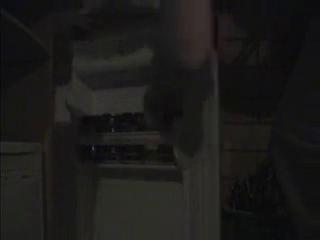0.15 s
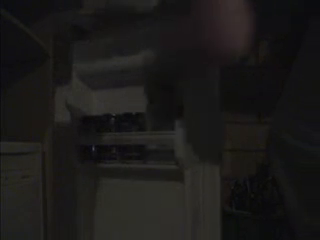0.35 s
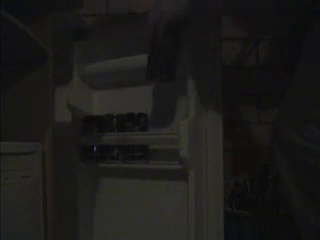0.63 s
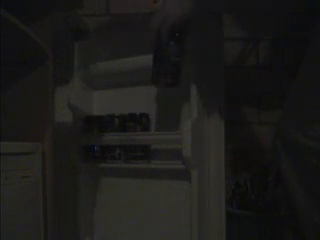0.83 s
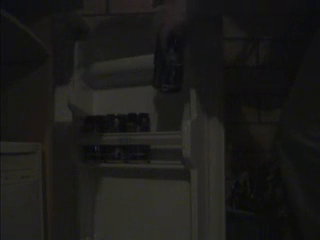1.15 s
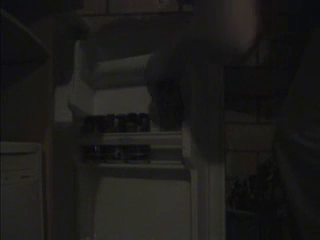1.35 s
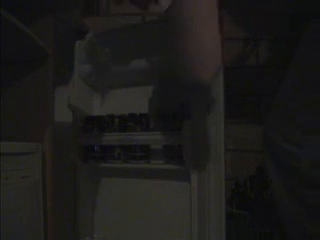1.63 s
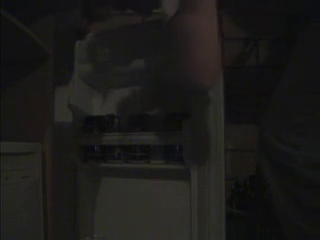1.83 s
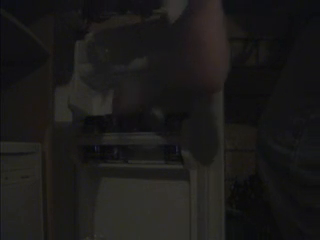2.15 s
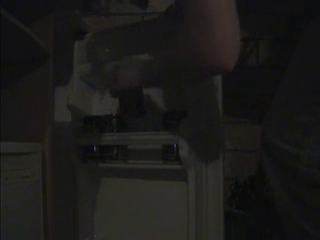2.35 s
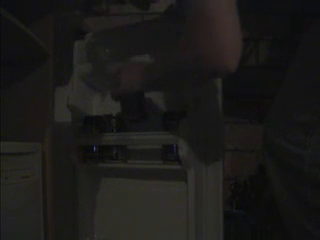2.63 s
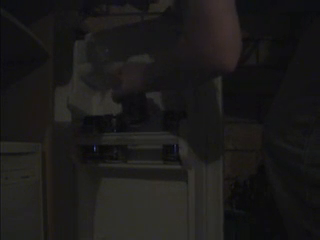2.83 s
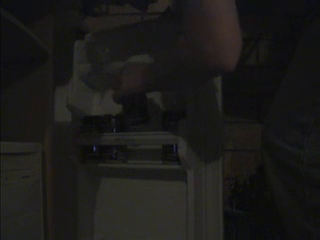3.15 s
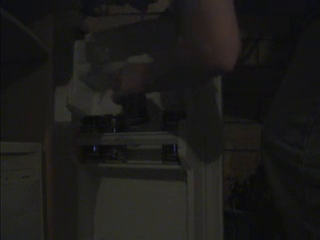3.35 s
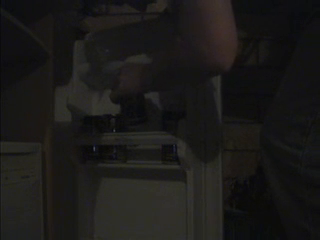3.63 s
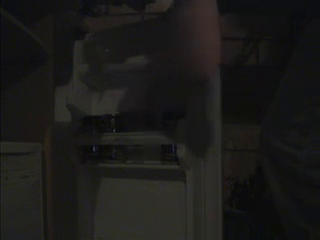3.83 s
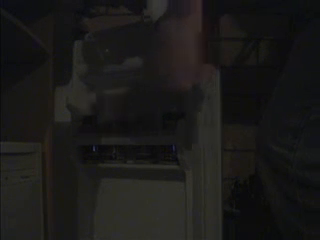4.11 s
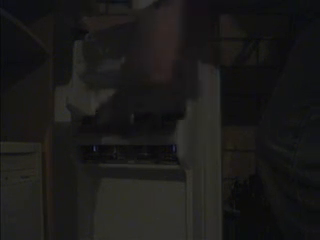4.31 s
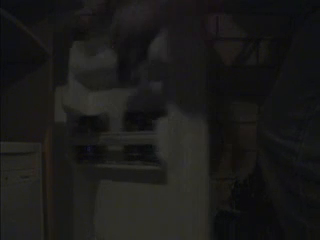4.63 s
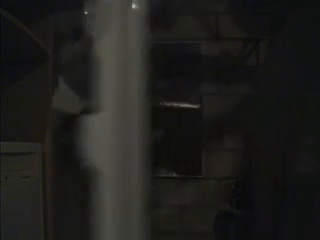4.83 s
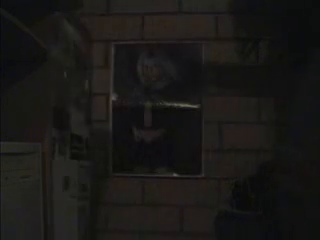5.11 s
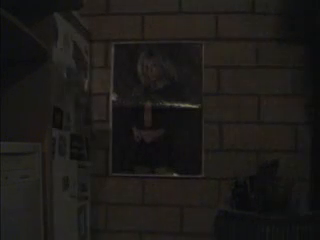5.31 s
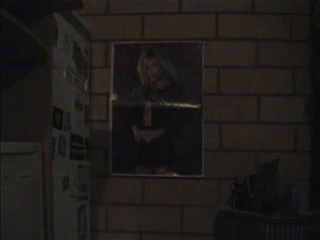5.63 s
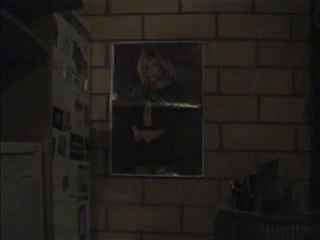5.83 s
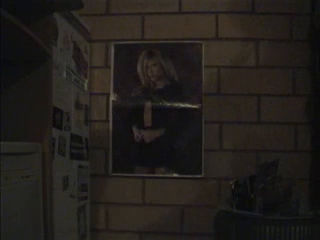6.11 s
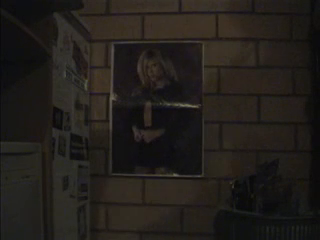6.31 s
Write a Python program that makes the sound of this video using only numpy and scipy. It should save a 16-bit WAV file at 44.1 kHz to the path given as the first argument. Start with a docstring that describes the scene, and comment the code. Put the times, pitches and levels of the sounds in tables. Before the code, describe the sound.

Stereo microphone near an open fridge: dull metallic can clunks, bright little ticks and short scraping slides against a plastic shelf, in uneven bunches. After nearly two seconds of near-quiet, the cans are handled again more densely. The door then thuds shut, deep and rattling, with a short room response; faint hum, hiss and one or two tiny late rubs remain.

```python
"""Over hum and a band of hiss, the scene opens with the door panel already ringing low and a rub, then drink
cans knock in a fridge door shelf. At about 5.4 s the door swings shut with a boom and a rattle; all is heard
close by, in a kitchen, in stereo. Knocks, pushes and slams are blows on dying sine modes, with noise puffs for
the ticks; slides are random grains. Sparse decaying taps give the kitchen's answer; room noise and hiss are
random spectra, the hum blurred sines."""
import sys
import numpy as np
from scipy import signal
from scipy.fft import rfft, irfft, next_fast_len
from scipy.io import wavfile
from scipy.ndimage import uniform_filter1d

SR = 44100
rng = np.random.default_rng(int(sys.argv[2]) if len(sys.argv) > 2 else 0)


def output_pcm(signal):
    """Save a mono or channel-first signal as 16-bit PCM at the path in sys.argv[1].

    Samples are clipped to [-1, 1] before scaling.
    """
    pcm = np.clip(np.atleast_2d(signal).T, -1, 1) * 32767
    wavfile.write(sys.argv[1], SR, np.round(pcm).astype(np.int16))


N = 285327

# broad room noise, relative spectrum: f/Hz, level/dB per Hz
ROOM_NOISE = [(15, -28), (30, -26), (70, -1.5), (125, -11), (230, 6), (320, -8.5), (600, 4), (830, -6.5),
              (1500, -10.5), (2000, -9), (3200, -25), (5300, -35), (8000, -69)]
# band of hiss, relative spectrum: f/Hz, level/dB per Hz
HISS_BAND = [(2940, -9), (5000, -12), (6340, 4.5), (7120, -4.5), (8810, -45.5), (9250, -20), (9940, -19),
             (12100, -35), (12500, -43), (15900, -34)]
ROOM_NOISE_DB, HISS_DB = -47, -49  # rms
# left-right likeness of room noise and hiss: f/Hz, correlation
LIKENESS = [(60, 0.35), (130, 0.75), (290, 0.35), (640, 0.16), (1410, 0.39), (3100, 0.76), (6820, 0.48),
            (15000, 1)]
# lines of the fridge motor and fan: f/Hz, width/Hz, rms level/dB
HUM_LINES = [(50, 5, -63), (91, 4, -54), (223, 10, -62), (286, 5, -61), (482, 8, -65), (611, 8, -61),
             (758, 6, -67), (1930, 4, -62), (1960, 4, -64)]
# blows on the door panel: a low ring already going as the scene opens, then a hand leaning on it: t/s, peak
# level/dB
HAND_NUDGES = [(0.0, -16), (4.69, -14)]
# modes of the door panel: f/Hz, relative level/dB, t60/s
PANEL_MODES = [(76.8, -2.5, 0.36), (87, -7, 0.39), (100.75, 3, 0.51), (123, 3.5, 0.11), (150, 4.5, 0.38),
               (162.3, 8.5, 0.089), (178.3, 2.5, 0.26)]
# hand and cans sliding: start t/s, length/s, level/dB, swell over the stroke/dB, tone of the rubbed can f/Hz
STROKES = [(0.0, 0.17, -31.5, -5, 560), (0.128, 0.093, -21.5, -10.5, 1500), (0.41, 0.26, -36.5, -2, 1060),
           (1.093, 0.077, -41, -4.5, 700), (1.772, 0.2, -37.5, -13, 900), (1.923, 0.095, -25.5, -5.5, 900),
           (2.041, 0.12, -29.5, -10, 940), (2.217, 0.22, -44, -7, 1900), (2.407, 0.051, -42.5, 18, 900),
           (4.289, 0.11, -17, -27, 950), (4.451, 0.13, -24.5, -6.5, 950), (4.58, 0.14, -29.5, -6, 1470),
           (4.752, 0.12, -27, -5, 890), (4.85, 0.067, -28, -2.5, 2460), (4.96, 0.042, -34.5, -10.5, 900),
           (5.044, 0.081, -45.5, 0, 900), (5.123, 0.15, -38, -0.5, 1150), (5.392, 0.13, -32.5, 7, 910),
           (5.578, .17, -42, -1.5, 650), (6.059, 0.072, -49.5, 9.5, 900), (6.17, 0.15, -40, -14, 900)]
# relative spectrum of the rubbing: f/Hz, level/dB per Hz
RUB_SPECTRUM = [(59, -55), (100, 3), (255, -7), (451, -7.5), (1020, -11.5), (1530, -7), (2600, -16.5),
                (4890, -23.5), (6770, -30.5), (9380, -53.5), (13000, -53)]
GRIP_S, LET_GO_S = 0.015, 0.032  # fades outside each stroke
GRAINS_PER_S, GRAIN_SPREAD_DB, RUNG_DB = 2500, 4.5, -5  # RUNG_DB: ringing against bare rubbing
# decay of the kitchen: f/Hz, t60/s
KITCHEN_DECAY = [(60, 0.92), (160, 0.35), (420, 0.61), (1100, 0.32), (2910, 0.36), (7680, 0.14)]
# the opposed left-right part of the kitchen: f/Hz, gain/dB
KITCHEN_WIDTH = [(60, -37.5), (180, -28), (550, -27.5), (1650, -27), (5000, -43), (15000, -23)]
# cans against the shelf and each other: t/s, peak level/dB of panel (before its high-pass), shelf, can wall
# (before its left-right balance) and rim, then wall tone f/Hz, rim tone f/Hz
CAN_KNOCKS = [(0.014, -29, -52, -20, -42, 570, 1650), (0.117, -18, -7, -8.5, -18.5, 820, 1960),
              (0.124, -22, -4.5, -17, -14, 840, 2300), (0.147, -38, -13.5, -22, -18.5, 940, 1850),
              (0.179, -22, -11.5, -12, -20, 720, 1980), (0.197, -28, -26, -22, -25, 685, 2400),
              (0.252, -23.5, -31, -31, -40, 630, 1950), (0.38, -30.5, -48, -20, -23.5, 920, 1665),
              (0.403, -23, -14.5, -42, -24.5, 1087, 2560), (0.488, -28, -26, -21, -32.5, 1010, 1900),
              (0.542, -44, -38, -26, -42, 776, 2000), (0.581, -22, -38, -22.5, -29, 790, 1990),
              (0.604, -19, -8.5, -17.5, -7.5, 800, 2020), (0.611, -16, -21, -15, -27, 776, 2120),
              (0.633, -35, -9, -15.5, -18.5, 666, 1940), (0.65, -19.5, -42, -35, -58, 670, 2270),
              (0.848, -28, -33, -46, -42, 740, 2010), (1.105, -31, -25.5, -23.5, -36.5, 573, 2140),
              (1.403, -42.5, -37, -52, -57, 740, 2100), (1.738, -17.5, -15.5, -12, -12.5, 620, 2500),
              (1.747, -23, -10.5, -12, -15, 740, 2400), (1.773, -18, -33, -32, -51, 600, 2100),
              (1.791, -37, -16.5, -18.5, -19, 680, 2420), (1.82, -26, -21, -38, -39, 670, 2210),
              (1.922, -23, -33, -3.5, -13, 930, 1740), (1.932, -23.5, -45.0, -12, -22, 780, 1730),
              (1.954, -51, -22, -10, -19, 920, 1670), (1.987, -25, -30, -19, -25.5, 820, 2080),
              (2.03, -40, -46, -10, -18.5, 1010, 1990), (2.043, -28, -24, -28, -16, 1130, 1670),
              (2.065, -24, -22, -12.5, -20, 890, 1770), (2.084, -23, -16, -16, -22, 960, 1830),
              (2.103, -38, -25, -17, -25, 890, 2010), (2.121, -19, -31, -42, -36, 800, 2000),
              (2.202, -21, -25, -32.5, -33, 710, 2090), (2.278, -38, -32, -46, -36.5, 740, 2050),
              (2.299, -32, -54, -55, -30.5, 740, 2040), (2.425, -24, -37, -26, -35, 900, 1790),
              (2.459, -12.5, -9.5, -14.5, -12.5, 706, 2090), (2.47, -15, -14, -19, -39, 710, 2040),
              (4.145, -24, -4, -13.5, -6.5, 690, 1930), (4.152, -27, -7, -15, -16, 690, 2010),
              (4.169, -13, -9.5, -47, -42, 740, 1970), (4.181, -28, -7, -13, -11, 670, 2000),
              (4.205, -28, -13, -21, -24, 700, 2060), (4.264, -16, -23, -7.5, -11, 1200, 2030),
              (4.273, -21, -21.5, -2.5, -41, 880, 1910), (4.292, -33, -19, -8, -34, 960, 1790),
              (4.447, -33, -29, -5, -26, 910, 1550), (4.474, -27.5, -20, -8, -22.5, 795, 1860),
              (4.494, -24, -37, -12, -24.5, 790, 1830), (4.51, -43, -30.0, -12.5, -22, 880, 1690),
              (4.564, -18.5, -4, -13.5, -10, 665, 1990), (4.572, -30, -8.5, -28, -18.5, 700, 2170),
              (4.588, -14.5, -7.5, -16, -27, 880, 2000), (4.637, -17, -40, -40, -29.5, 680, 3300),
              (4.676, -14.5, -13.5, -18, -17, 724, 2030), (4.698, -28, -28, -41, -24, 740, 2400),
              (4.729, -30, -26, -43, -29, 700, 2190), (4.752, -31, -39, -14, -23, 930, 1830),
              (4.779, -38, -48, -19, -28, 850, 2010), (4.813, -31, -21, -9.5, -20, 890, 1620),
              (4.853, -29, -15, -33, -21.5, 770, 2570), (4.88, -43.0, -6.5, -19.5, -16, 700, 2310),
              (4.913, -23.5, -17, -21.5, -33, 640, 2400), (4.937, -23, -26, -39, -33, 700, 2000),
              (5.188, -44.0, -65, -34, -34.5, 650, 2000), (5.228, -31, -30.5, -34, -33, 600, 1990),
              (6.101, -30, -30, -51, -51, 940, 1900)]
# modes of the plastic shelf: f/Hz, relative level/dB, t60/s
SHELF_MODES = [(201.2, -11.5, 0.11), (231.3, -6.5, 0.17), (246, -15.5, 0.039), (265.2, -2.5, 0.17),
               (291.4, -15, 0.23), (350.4, -16, 0.093), (382, -20, 0.1), (475, -15.5, 0.054),
               (554.5, -20, 0.11)]
# modes of a can's wall: f/Hz, relative level/dB, t60/s
WALL_MODES = [(558, 7, 0.03), (670, 1, 0.025), (675, 2.5, 0.026), (786.4, -4, 0.065), (830, -4.5, 0.059),
              (874, -7.5, 0.035), (920, 0.5, 0.053), (969, -0.5, 0.04), (1010, -6.5, 0.028),
              (1074, 6, 0.022), (1102, -7, 0.053), (1219, 2, 0.054), (1363, 4.5, 0.033), (1505, 4, 0.022)]
# modes of a can's rim: f/Hz, relative level/dB, t60/s
RIM_MODES = [(1560, -8, 0.025), (1671, -9, 0.041), (1910, -14.5, 0.012), (1945, -5, 0.044),
             (2090, -10.5, 0.038), (2164, -7.5, 0.034), (2300, 4, 0.0082), (2584, -1, 0.018),
             (2620, 3.5, 0.0079), (2827, -6.5, 0.053), (3160, -2.5, 0.027), (3452, 0, 0.031),
             (3796, 3, 0.034), (4410, 3.5, 0.056)]
# relative spectrum of the tick of contact: f/Hz, level/dB per Hz
TICK_SPECTRUM = [(1470, -2), (2500, 5.5), (2960, -0.5), (4240, -3), (4830, -5.5), (5560, -8), (8250, -12),
                 (10200, -23), (11100, -33), (13400, -36), (15100, -45), (16000, -37)]
# tick against rim; a blow hard on another's heels has less
TICK_SHARE_DB, REBOUND_DULL_DB, REBOUND_S = 0.5, -20.5, 0.016
# the door meets the cabinet and bounces on its seal: t/s, peak level/dB of cabinet and of the rattling
# can walls (before their left-right balance), cabinet tone f/Hz
DOOR_SLAMS = [(5.363, -28.5, -34, 120), (5.392, -15.5, -53, 128), (5.402, -15, -35, 140),
              (5.432, -29, -34, 150), (5.445, -10.5, -7, 101), (5.452, -13, -22, 110),
              (5.458, -13, -24, 300), (5.472, -9, -23, 265), (5.485, -6.5, -18, 201),
              (5.499, -16, -13.5, 220), (5.51, -8, -16, 207), (5.53, -16.5, -17, 170),
              (5.547, -7, -23, 160), (5.585, -14.5, -37, 111), (5.635, -21, -35, 200),
              (5.666, -29, -34.5, 150), (5.723, -27, -34, 150), (5.787, -32, -35.5, 90)]
# modes of the cabinet: f/Hz, relative level/dB, t60/s
CABINET_MODES = [(96.4, 6, 0.12), (131, -1.5, 0.21), (160.5, -3.5, 0.21), (179, -1, 0.21),
                 (208, -1.5, 0.16), (257.6, -0.5, 0.12), (322, -2, 0.13), (409, -0.5, 0.066),
                 (498, -6.5, 0.086)]
# the whole fridge body shakes: t/s, peak level/dB
BODY_BOOMS = [(5.395, -24), (5.443, -8), (5.555, -20)]
# modes of the fridge body: f/Hz, relative level/dB, t60/s
BODY_MODES = [(33, -23, .5), (51.5, 0, 1), (67.4, -3, 0.3), (74.6, 0.5, 0.99), (95.5, 7, 0.18)]
RATTLE_WALL_HZ, RATTLE_RIM_HZ = 680, 2200
RATTLE_RIM_DB, RATTLE_TICK_DB = -15, -7  # against the wall level
EDGE_HZ = 15900  # upper band limit


def gain_of(db):
    """Decibels to amplitude."""
    return 10 ** (np.asarray(db) / 20)


def evened(x):
    """Scales to rms 1."""
    return x / np.sqrt(np.mean(x ** 2) + 1e-20)


def read(points, hz):
    """Reads a table on a log-frequency axis."""
    f, value = np.transpose(points)
    return np.interp(np.log(hz + 1), np.log(f + 1), value)


def coloured(x, spectrum):
    """Filters by a spectrum in dB."""
    size = next_fast_len(x.shape[-1])
    gains = gain_of(read(spectrum, np.fft.rfftfreq(size, 1 / SR)))
    return irfft(rfft(x, size) * gains, size)[..., :x.shape[-1]]


def add(mix, s, sound):
    """Mixes a two-sided sound in at s seconds."""
    part = mix[:, round(s * SR):][:, :sound.shape[1]]
    part += sound[:, :part.shape[1]]


def floor():
    """Room noise and hiss as random short-time spectra with soft uneven patches, partly alike left and right."""
    frames, hz = N // 512 + 5, np.fft.rfftfreq(2048, 1 / SR)
    a, b, c, d, patches = rng.standard_normal((frames, 1025, 5)).T
    patches = uniform_filter1d(patches, 10, 0)  # over frequency
    patches = evened(uniform_filter1d(patches, 8, 1))  # over time
    same = np.clip(read(LIKENESS, hz), -1, 1)[:, None]
    left, other = a + 1j * b, c + 1j * d
    spectra = np.array([left, same * left + np.sqrt(1 - same ** 2) * other])
    spectra *= gain_of(1.5 * patches)
    white = signal.istft(spectra, nperseg=2048, noverlap=1536)[1][:, :N]
    room_noise = gain_of(ROOM_NOISE_DB) * evened(coloured(white, ROOM_NOISE))
    return room_noise + gain_of(HISS_DB) * evened(coloured(white, HISS_BAND))


def fridge():
    """Wavering lines: a steady tone blurred by a narrow band of noise, mostly alike on both sides."""
    size = next_fast_len(N)
    hz, t = np.fft.rfftfreq(size, 1 / SR), np.arange(N) / SR
    out = np.zeros((2, N))
    for f, width, db in HUM_LINES:
        noise = rng.standard_normal((3, size))
        two_sided = noise[0] + 0.16 * noise[1:]
        band = 1 / (1 + ((hz - f) / width) ** 2)
        blur = evened(irfft(rfft(two_sided) * band, size)[:, :N])
        tone = 2.0 * np.sin(2 * np.pi * (f * t + rng.random()))
        out += gain_of(db) * evened(blur + tone)
    return out


def ringing(modes):
    """One dying sine a mode."""
    hz, db, t60 = np.transpose(modes)[:, :, None]
    t = np.arange(0, t60.max(), 1 / SR)
    return hz, t, gain_of(db - 60 * t / t60) * np.sin(2 * np.pi * hz * t)


def chatter(count, contact_s):
    """The contact force: one firm blow, then a weaker rattle while the parts settle."""
    t = np.arange(4096) / SR
    settling = np.exp(-t / contact_s) + gain_of(-3.5) * np.exp(-t / (4.9 * contact_s))
    rattle = (1 - np.exp(-t / 0.00027)) * settling * rng.standard_normal((count, 1, len(t)))
    firm_blow = gain_of(3.0) * (t == 0)
    return rattle / np.linalg.norm(settling) + firm_blow


def detuned(sounds, share):
    """Load and grip shift the pitch of each blow a little."""
    at = np.arange(sounds.shape[2])
    steps = 1 + share * rng.uniform(-1.057, 1, len(sounds))
    return [np.array([np.interp(at * step, at, side, right=0) for side in pair])
            for step, pair in zip(steps, sounds)]


def placed(times, peaks_db, sounds):
    """Sets each sound at its time and peak level."""
    out = np.zeros((2, N))
    for s, peak_db, sound in zip(times, peaks_db, sounds):
        add(out, s, gain_of(peak_db) * sound / abs(sound).max())
    return out


def struck(modes, times, peaks_db, contact_s, rise_s, spread_db, side_db, detune, tones_hz=None, focus_db=0):
    """Each blow wakes the modes in another mix, strongest near any given tone, slightly unlike on the two sides."""
    hz, t, rings = ringing(modes)
    chance = rng.standard_normal((len(times), 4, len(modes)))
    mix = gain_of(spread_db * chance[:, :1]) * np.sign(chance[:, 1:2])
    mix = mix * (1 + gain_of(side_db) * chance[:, 2:])
    if tones_hz is not None:
        octaves_off = abs(np.log2(hz.T / tones_hz[:, None]))
        mix = mix * gain_of(-focus_db * octaves_off)[:, None]
    swelling = rings * (1 - np.exp(-t / rise_s))  # each blow swells in softly over a short rise time
    blows = signal.fftconvolve(mix @ swelling, chatter(len(times), contact_s), axes=2)
    return placed(times, peaks_db, detuned(blows, detune))


def nudges():
    """Soft blows wake only the door panel: its low ring at the very start, and a later push."""
    return struck(PANEL_MODES, *np.transpose(HAND_NUDGES), contact_s=0.0011, rise_s=0.014,
                  spread_db=0.94, side_db=-15.0, detune=0.038)


def slides():
    """Rubbing: uneven grains under each stroke, partly ringing the can near its tone."""
    hz, _, rings = ringing(WALL_MODES + RIM_MODES)
    out = np.zeros((2, N))
    for start, length, db, swell_db, tone_hz in STROKES:
        t = np.arange(-GRIP_S, length + LET_GO_S, 1 / SR)
        touch = np.interp(t, [t[0], 0, length, t[-1]], [0, 1, 1, 0])
        touch = touch * gain_of(db + swell_db * np.clip(t / length, 0, 1))
        chance = rng.random((4, SR // 2))[:, :len(t)]
        grains = (chance[0] < GRAINS_PER_S / SR) * np.sign(chance[1] - .5)
        grains = grains * gain_of(-GRAIN_SPREAD_DB * np.log(chance[2] + 0.03))
        # a fine hiss, unlike on the two sides
        grains = grains + gain_of(-33.5) * (chance[2:] - .5) * np.sqrt(12)
        can = (rings * gain_of(-14.5 * abs(np.log2(hz / tone_hz)))).sum(0)
        rung = signal.fftconvolve(grains, can[None])[:, :len(t)]
        rubbed = evened(coloured(grains, RUB_SPECTRUM))
        sound = touch * evened(rubbed + gain_of(RUNG_DB) * evened(rung))
        begin = start + t[0]
        add(out, max(begin, 0), sound[:, max(round(-begin * SR), 0):])
    return out


def kitchen(x):
    """Sparse taps of random sign, each band dying at its own speed: three tails common to both sides and three
    opposed ones, which swell and fade in turn."""
    taps = np.zeros((6, SR))
    at = np.arange(130, SR - 20, 20) + rng.integers(0, 20, (6, (SR - 131) // 20))
    np.put_along_axis(taps, at, rng.choice([-1., 1.], at.shape), 1)
    hz, t, z = signal.stft(taps, SR, nperseg=512)
    t60 = np.maximum(read(KITCHEN_DECAY, hz), .03)[:, None]
    tail = signal.istft(z * gain_of(-60 * t / t60), SR, nperseg=512)[1]
    # 2 Hz cosines, a sixth of a cycle apart
    turns = np.sqrt(2 / 3) * np.cos(np.pi * (np.arange(N) * 4 / SR + np.arange(6)[:, None] / 3))
    wet = signal.fftconvolve(x * turns, tail / np.linalg.norm(tail[0]), axes=1)[:, :N]
    mid = gain_of(-13.5) * wet[:3].sum(0)
    side = coloured(wet[3:].sum(0), KITCHEN_WIDTH)
    return np.array([mid + side, mid - side])


def ticks(times, peaks_db, rise_s, t60):
    """The bright crack of first contact: a dying puff of treble, a little unlike on the two sides."""
    t = np.arange(4096) / SR
    noise = rng.standard_normal((len(times), 3, len(t)))
    two_sided = noise[:, :1] + gain_of(-41) * noise[:, 1:]
    puffs = coloured(two_sided, TICK_SPECTRUM) * gain_of(-60 * t / t60)
    return placed(times, peaks_db, puffs * (1 - np.exp(-t / rise_s)))


def metal(s, can_db, rim_db, tick_db, can_hz, rim_hz):
    """A can's wall, its rim and the tick of contact; the wall sounds a little to the left."""
    wall = struck(WALL_MODES, s, can_db, contact_s=0.0057, rise_s=0.00092, spread_db=2.0,
                  side_db=-11.0, detune=0.023, tones_hz=can_hz, focus_db=19.8)
    wall = wall * gain_of([[.8], [-.8]])  # left, right
    rim = struck(RIM_MODES, s, rim_db, contact_s=0.0046, rise_s=0.0012, spread_db=1.7,
                 side_db=-31.5, detune=0.0327, tones_hz=rim_hz, focus_db=24.7)
    return wall + rim + ticks(s, tick_db, rise_s=0.0049, t60=0.058)


def cans():
    """Cans knock; the metal rings high, the shelf and door panel low."""
    s, panel_db, shelf_db, can_db, rim_db, can_hz, rim_hz = np.transpose(CAN_KNOCKS)
    dulled_db = REBOUND_DULL_DB * np.exp(-np.diff(s, prepend=0) / REBOUND_S)
    tick_db = rim_db + TICK_SHARE_DB + dulled_db
    panel = struck(PANEL_MODES, s, panel_db, contact_s=0.0022, rise_s=0.00068, spread_db=3.3,
                   side_db=-16.0, detune=0.025)
    shelf = struck(SHELF_MODES, s, shelf_db, contact_s=0.00047, rise_s=0.002, spread_db=2.9,
                   side_db=-10.0, detune=0.015)
    # the panel knocks have little below 60 Hz
    panel = signal.sosfilt(signal.butter(2, 60, "high", fs=SR, output="sos"), panel)
    return panel + shelf + metal(s, can_db, rim_db, tick_db, can_hz, rim_hz)


def door():
    """The cabinet booms, the body of the fridge shakes and the cans in the door rattle along."""
    s, cabinet_db, can_db, cabinet_hz = np.transpose(DOOR_SLAMS)
    rattle = metal(s, can_db, can_db + RATTLE_RIM_DB, can_db + RATTLE_TICK_DB,
                   np.full(len(s), RATTLE_WALL_HZ), np.full(len(s), RATTLE_RIM_HZ))
    body = struck(BODY_MODES, *np.transpose(BODY_BOOMS), contact_s=0.0015, rise_s=0.0017,
                  spread_db=1.0, side_db=-32.0, detune=0.012)
    cabinet = struck(CABINET_MODES, s, cabinet_db, contact_s=0.0016, rise_s=0.0013, spread_db=1.16,
                     side_db=-13.5, detune=0.052, tones_hz=cabinet_hz, focus_db=6.4)
    return cabinet + body + rattle


def scene():
    """The mean of both sides of everything near the door feeds the kitchen; noise and hum stay without it."""
    near = nudges() + slides() + cans() + door()
    return floor() + fridge() + near + kitchen(near.mean(0))


def record(dry):
    """The microphone input clips at full scale; then the band limit."""
    lowpass = signal.firwin(511, EDGE_HZ, window=("kaiser", 9), fs=SR)
    return signal.oaconvolve(np.clip(dry, -1, 1), lowpass[None], "same")


dry = scene()
out = record(dry)
output_pcm(out)
```